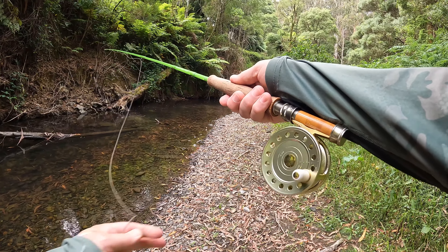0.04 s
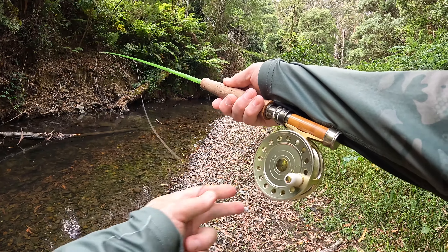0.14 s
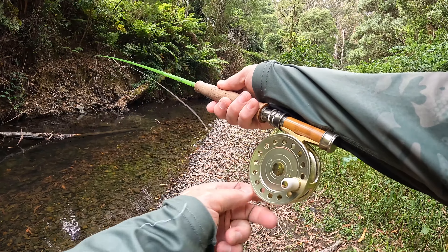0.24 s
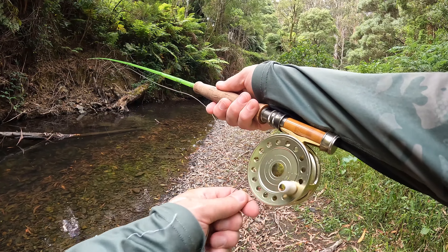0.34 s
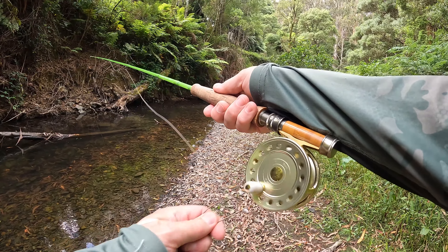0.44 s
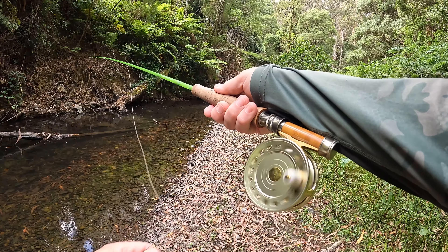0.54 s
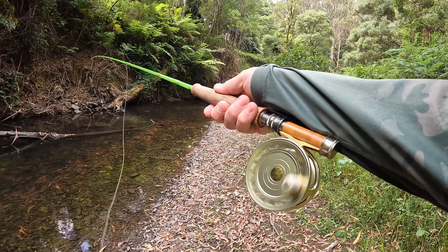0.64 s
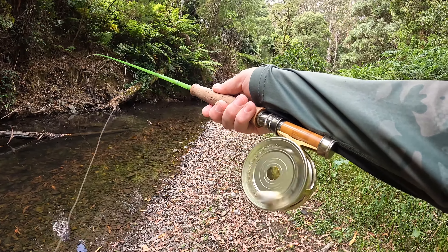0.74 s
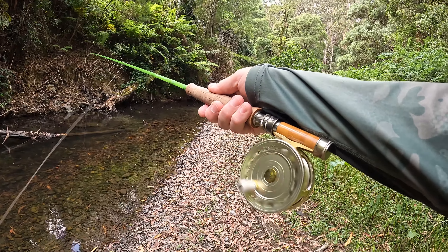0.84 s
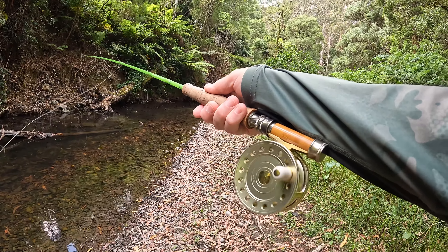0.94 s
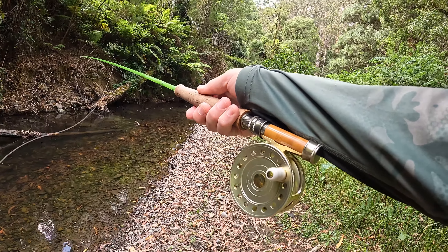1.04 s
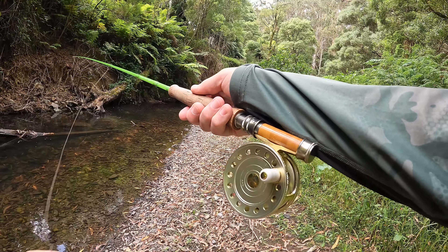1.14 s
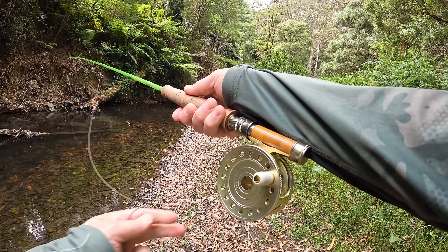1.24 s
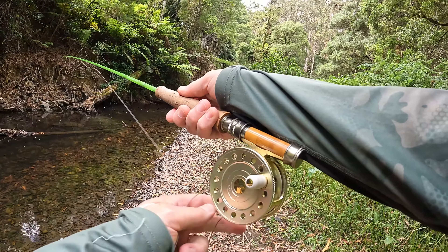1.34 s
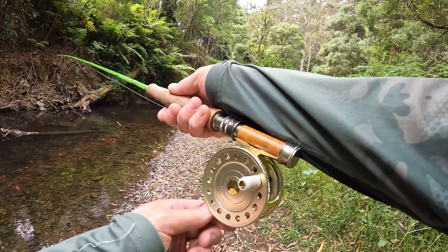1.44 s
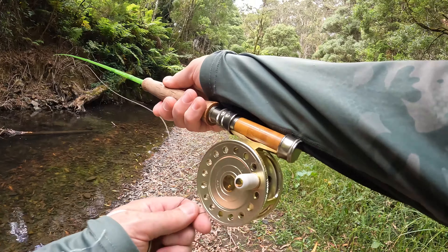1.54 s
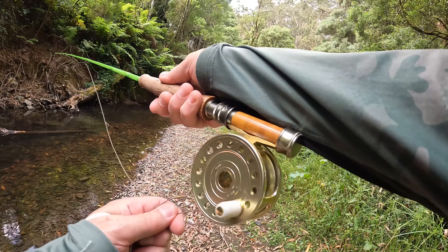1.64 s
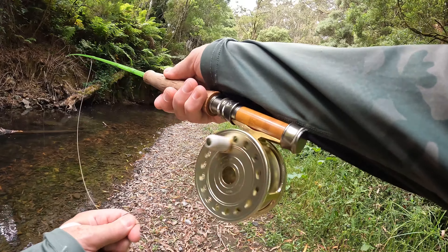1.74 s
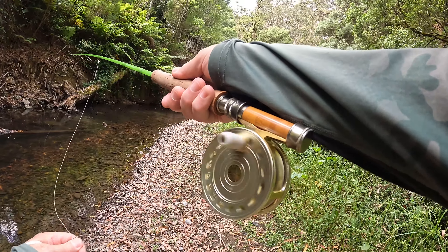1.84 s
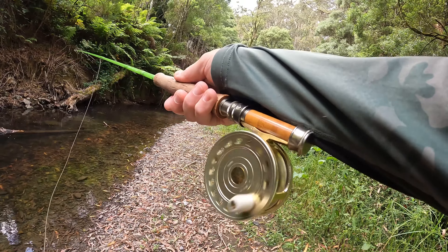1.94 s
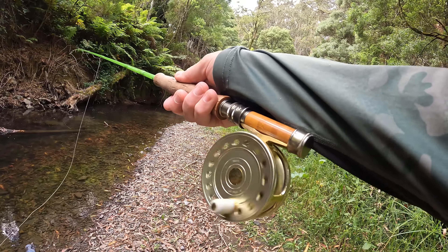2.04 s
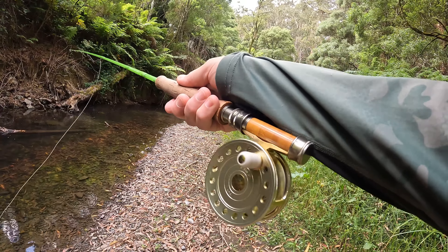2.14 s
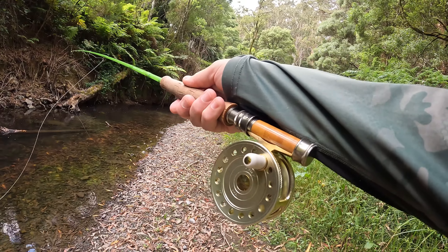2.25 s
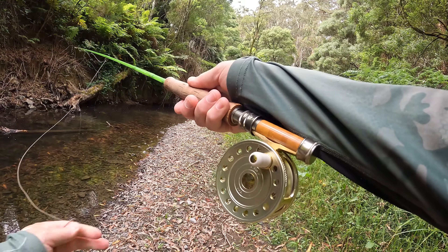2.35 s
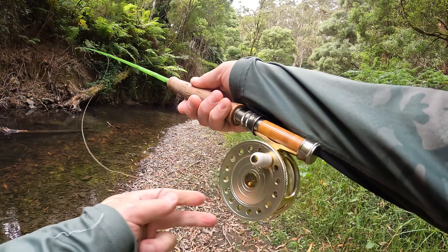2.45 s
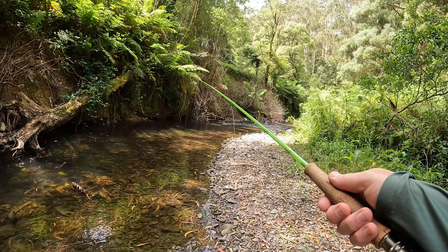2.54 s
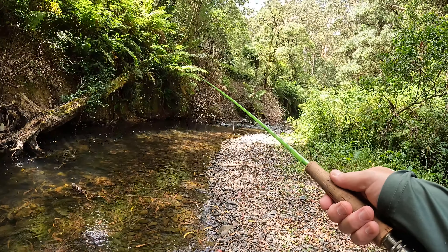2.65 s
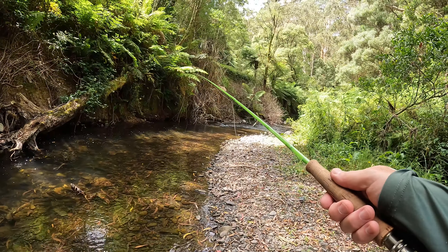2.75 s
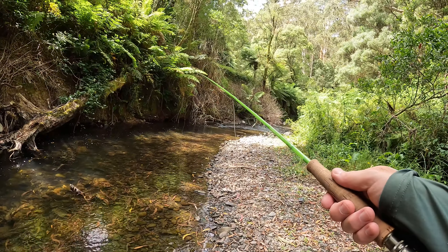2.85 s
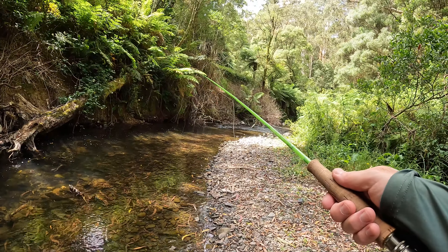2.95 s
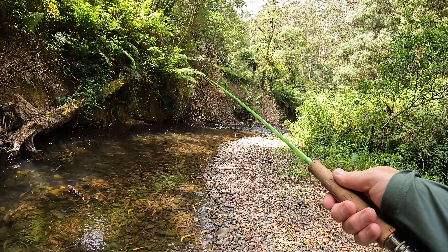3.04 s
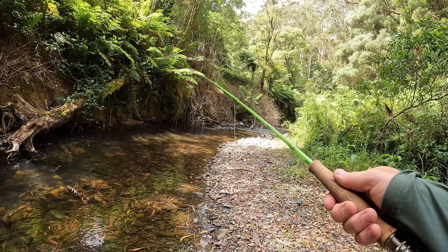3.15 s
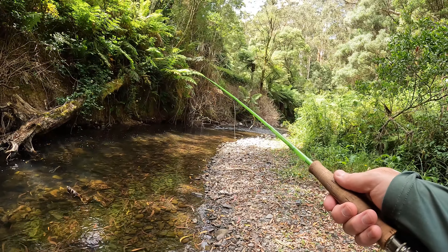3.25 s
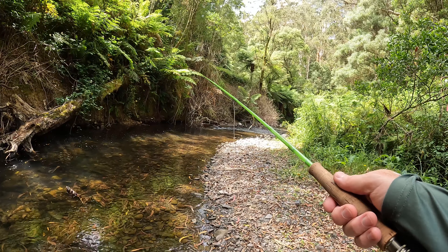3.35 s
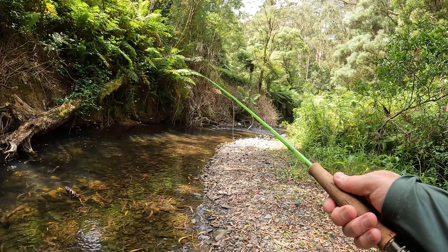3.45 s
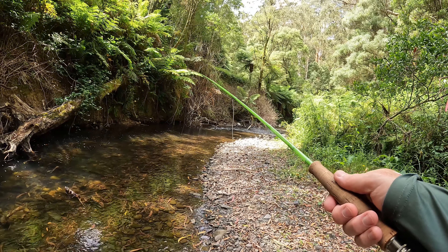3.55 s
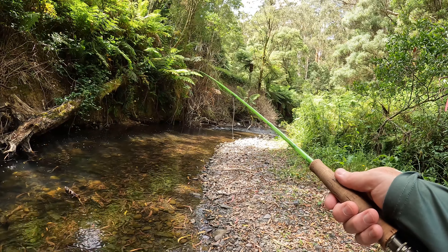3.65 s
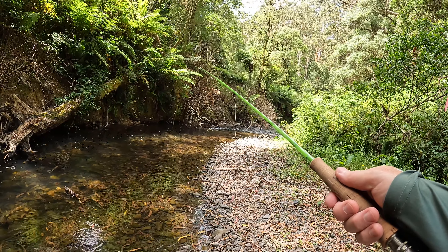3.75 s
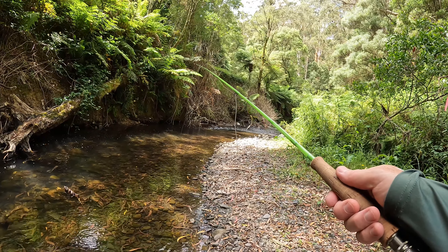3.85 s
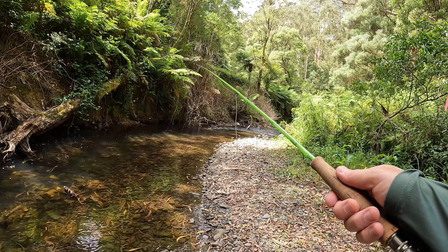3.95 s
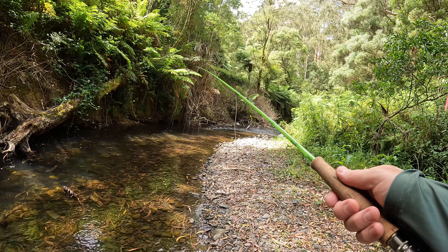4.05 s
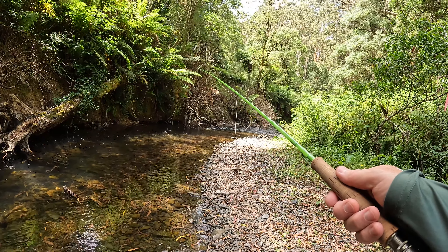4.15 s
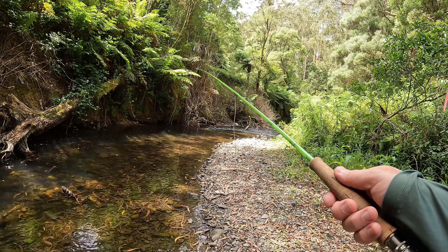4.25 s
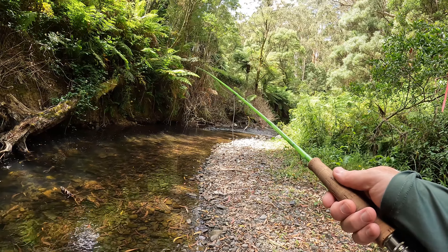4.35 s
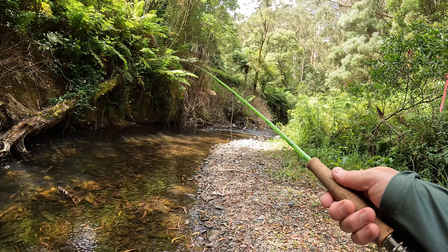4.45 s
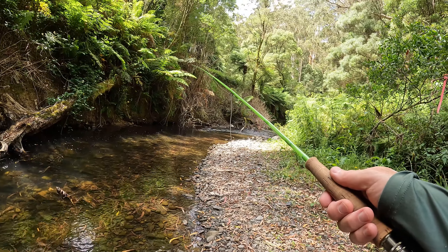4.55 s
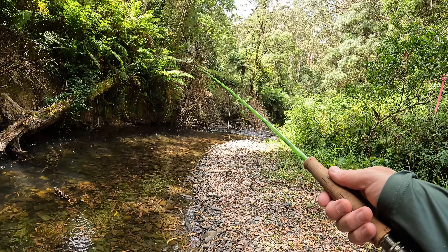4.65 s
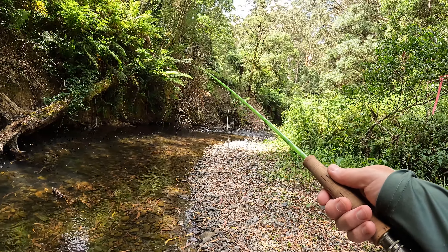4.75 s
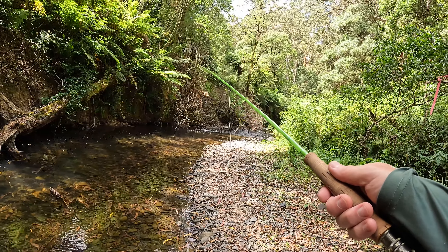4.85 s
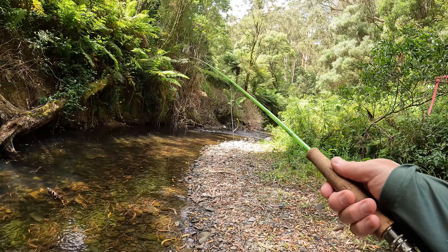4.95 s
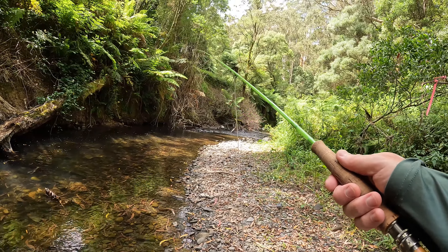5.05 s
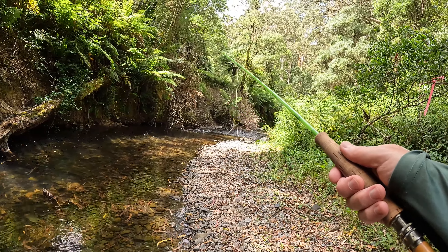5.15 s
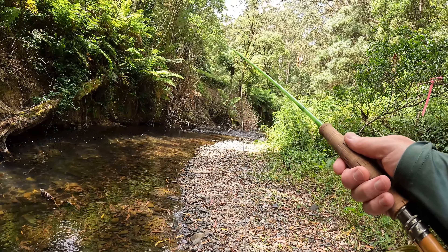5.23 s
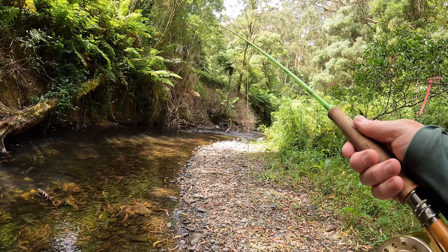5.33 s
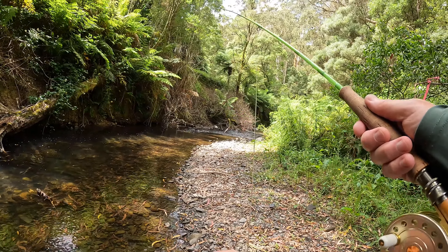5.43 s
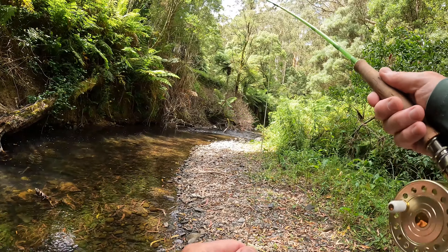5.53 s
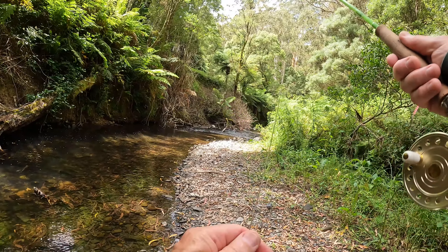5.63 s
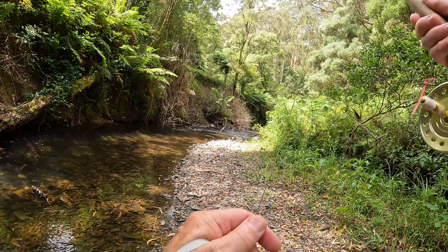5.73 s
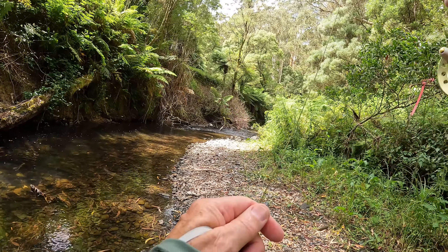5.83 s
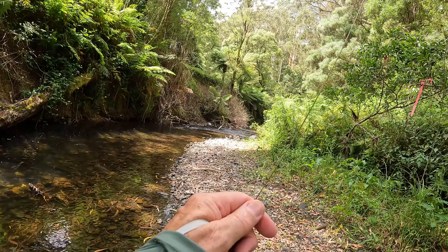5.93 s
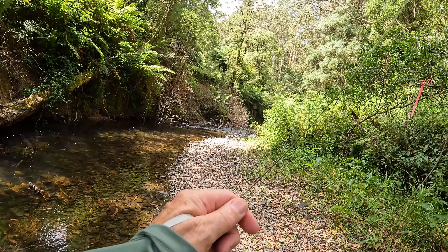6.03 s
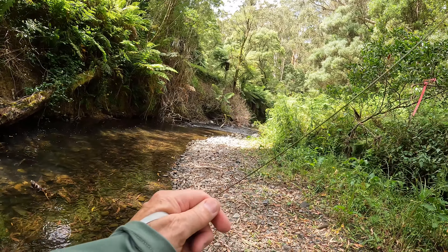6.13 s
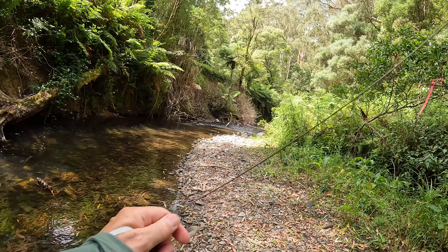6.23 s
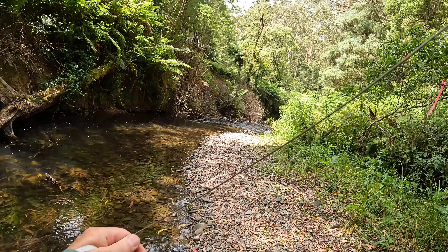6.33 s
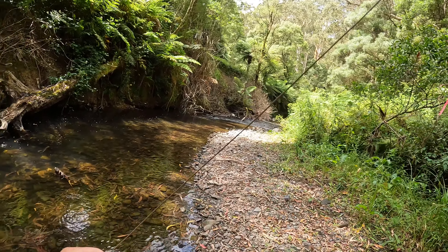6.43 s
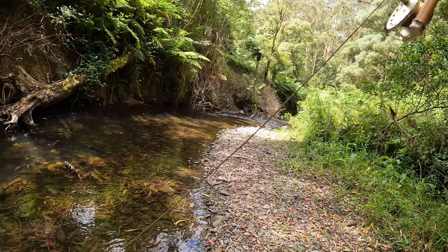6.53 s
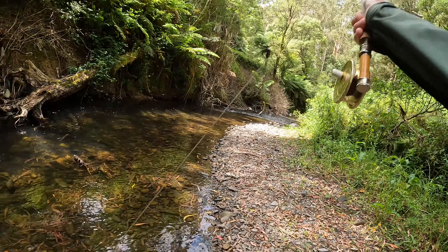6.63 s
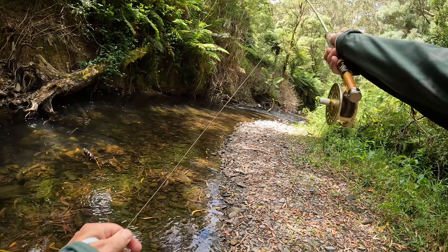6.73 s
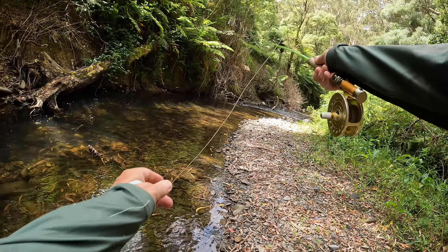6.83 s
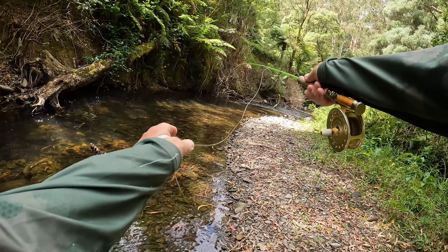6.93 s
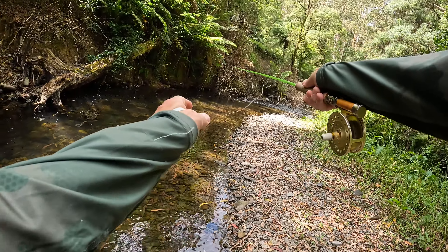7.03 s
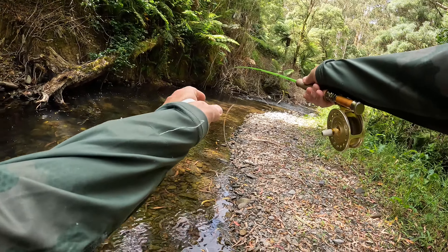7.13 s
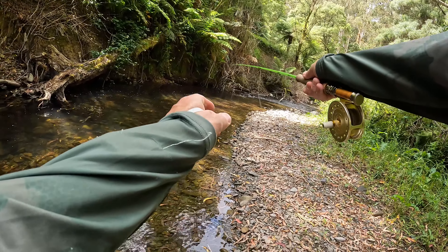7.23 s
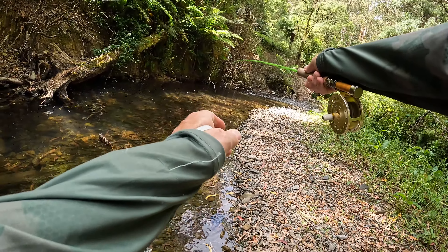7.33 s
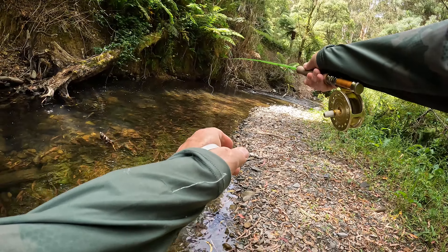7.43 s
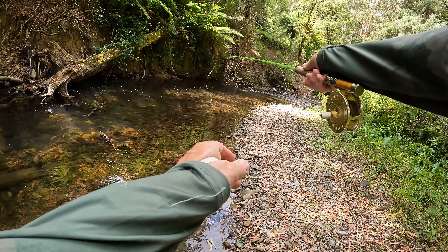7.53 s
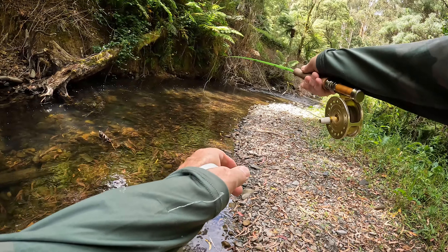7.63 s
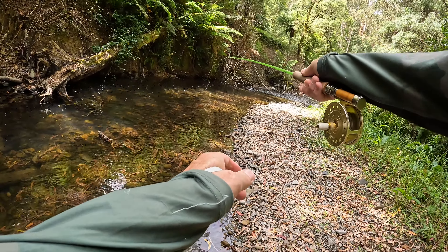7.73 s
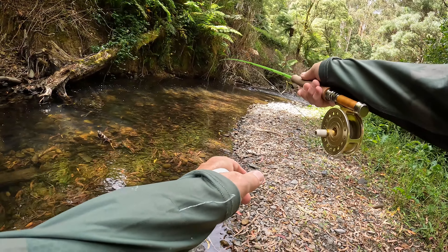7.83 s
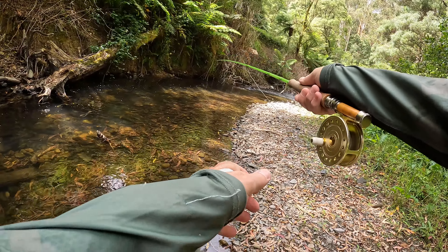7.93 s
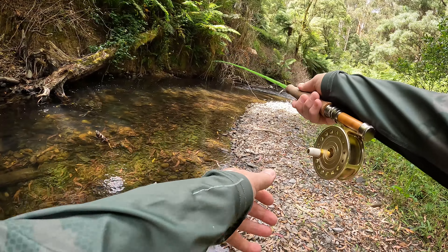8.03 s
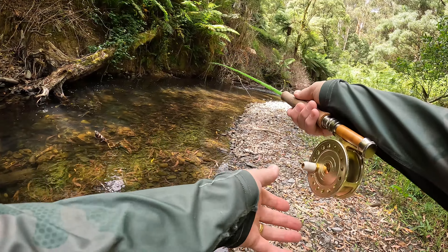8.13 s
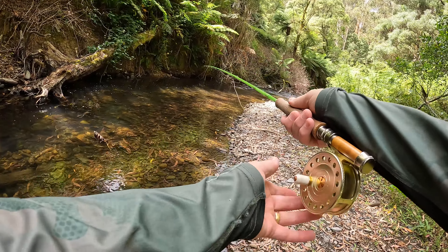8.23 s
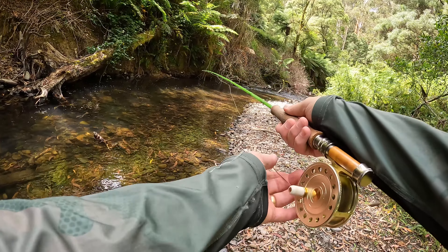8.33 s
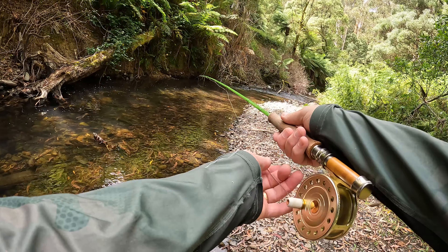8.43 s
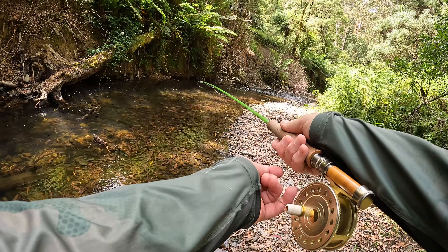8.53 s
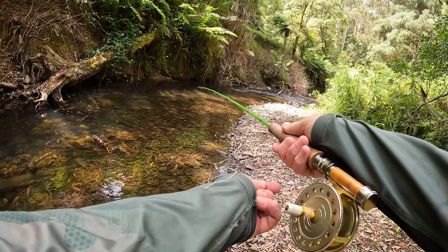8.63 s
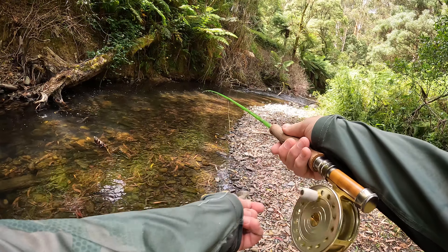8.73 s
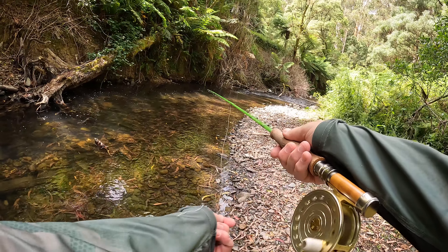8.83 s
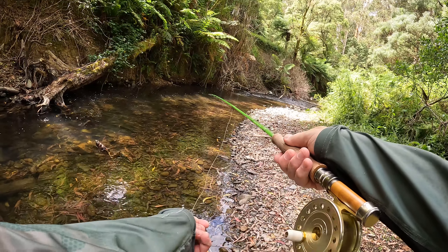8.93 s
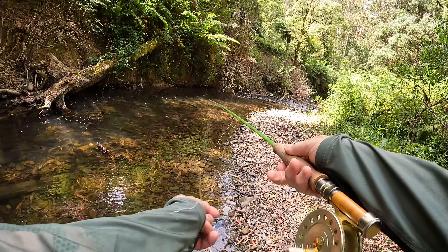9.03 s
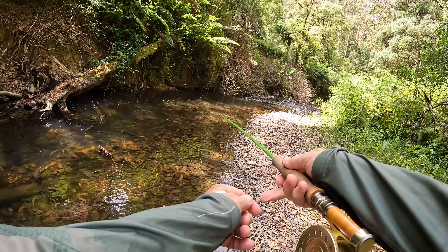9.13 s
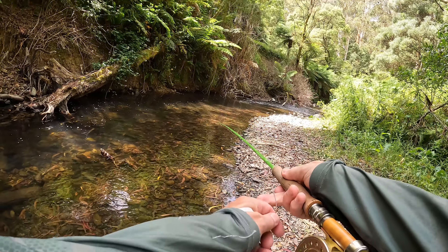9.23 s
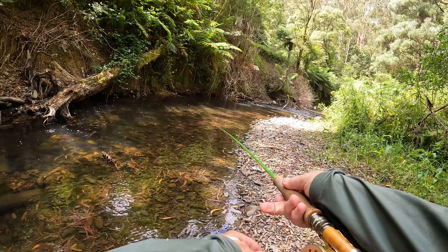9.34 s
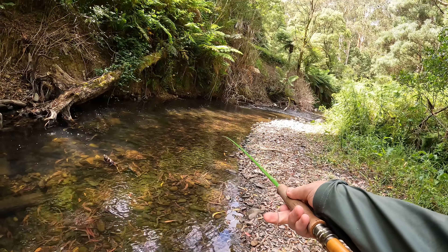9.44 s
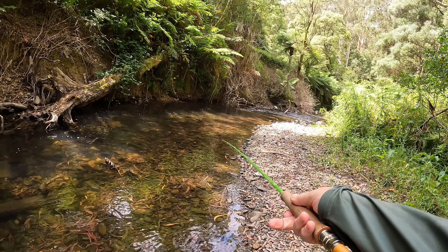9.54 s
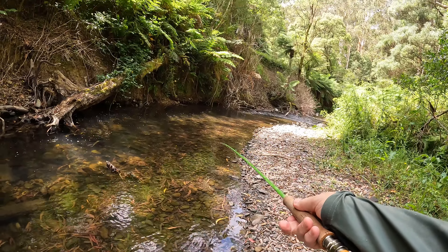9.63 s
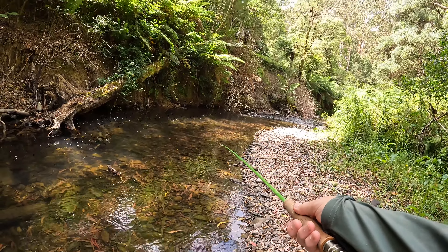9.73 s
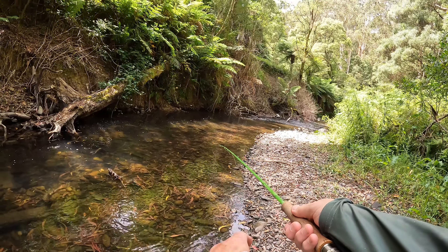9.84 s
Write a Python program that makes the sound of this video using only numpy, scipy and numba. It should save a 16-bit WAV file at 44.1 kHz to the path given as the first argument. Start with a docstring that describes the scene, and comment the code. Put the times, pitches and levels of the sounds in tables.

```python
"""Two long pulls of line off a fine click-and-pawl fly reel by a forest creek pool, each tooth snapping the pawl
and ringing spool and frame. At 2.55 s a second spot begins, beside a riffle: bubbles babble, birds whistle,
line scrapes and ticks through the rod rings, then one short pull rings a coarser reel.
Cloth brushes, knocks and low bumps come in between; gain control turns loud sounds down and creeps back."""
import sys
import numpy as np
from scipy import signal
from scipy.fft import rfft, irfft, next_fast_len
from scipy.io import wavfile
from scipy.ndimage import uniform_filter1d
from numba import njit

SR = 44100
rng = np.random.default_rng(int(sys.argv[2]) if len(sys.argv) > 2 else 0)


def write(x):
    x = np.atleast_2d(x).T
    wavfile.write(sys.argv[1], SR, np.round(np.clip(x, -1, 1) * 32767).astype(np.int16))


N = 435708
T = np.arange(N) / SR
SECOND_SPOT_S = 2.548
FINE_LOBE_TEETH, COARSE_LOBE_TEETH = 30, 38  # teeth between two swells of a ring

# Ring modes of each reel: (frequency [Hz], width [Hz], relative level [dB], swell phase [tooth], swell [dB])
FINE_MODES = [(781, 71, -13, 21.9, 4.5), (1130, 140, -26.5, 0.5, 6), (1449, 45, -9.5, 6.9, 7),
              (1820, 600, -28, 18, 5), (2237, 79, -10.5, 0.87, 2), (2630, 150, -8, 15, 3.5),
              (2974, 60, 4, 22.8, 1.5), (3224, 117, 3, 21.7, 3), (3316, 105, 1.5, 33, 2),
              (3660, 410, -11.5, 5.1, -2), (4260, 34, 0, 35, 0.5), (4490, 21, -13, 28, -6.5),
              (4730, 160, -7, 0.93, 4), (4960, 170, -9.5, 18.4, 9), (5200, 900, -19.5, 4, -3),
              (5630, 110, -11, 19, 0.5), (5950, 460, -23, 20, -2), (6440, 300, -15.5, 8.3, 1.5),
              (6970, 180, -11.5, 6.9, 3.5), (7780, 760, -24.5, 7.4, -2.5), (9640, 300, -24.5, 4.5, 1),
              (10760, 205, -13, 2.4, 3), (12800, 1300, -31, 8, 1.5)]
COARSE_MODES = [(1402, 62, -5.5, 22, 9.2), (1600, 280, -18.5, 10, 2.5), (1270, 105, -17.5, 16, 3.4),
                (2500, 860, -14.5, 1, 4), (2080, 81, -12, -2, 3.4), (2770, 130, -8.5, -1, 6.4),
                (2907, 65, -5.5, 25.5, 3), (3300, 145, 3.5, 15, 3.45), (3387, 48, 1.5, 12, 1.7),
                (3710, 380, -6, 1, 3.4), (4250, 44, -6, 17, 3.4), (4620, 140, -12.5, 22, 3),
                (5000, 180, -8.5, 14.5, 3.95), (5230, 240, -12, 6, 4), (5630, 700, -20, 6, 3),
                (7000, 15, -10, 30.5, 1.6), (7030, 580, -14, -3.5, 3.5), (8170, 450, -20.5, 5, 1),
                (10870, 370, -8.5, 15, 0.91), (11260, 400, -9.5, 13, 1), (12940, 260, -22.5, 4, 0.81)]


def undb(db):
    """Decibels to gain."""
    return 10 ** (np.asarray(db) / 20)


def unit(x):
    """Scale to standard deviation 1."""
    return x / np.std(x)


def band(x, hz, width_hz):
    """Fixed resonance with gain 1 at its centre."""
    hz = min(hz, .45 * SR)
    b, a = signal.iirpeak(hz, hz / min(width_hz, SR / 4), fs=SR)
    return signal.lfilter(b, a, x + 1e-18)


@njit
def moving_band(x, hz, width_hz):
    """State-variable resonance whose centre moves, with gain 1 there."""
    y, b, low = np.empty(len(x)), 0., 0.
    for i in range(len(x)):
        g, k = np.tan(np.pi * min(hz[i] / SR, .45)), width_hz / hz[i]
        k *= (np.pi * hz[i] / SR) * (1 + g * g) / g
        v = (b + g * (x[i] + 1e-18 - low)) / (1 + g * (g + k))
        b, low, y[i] = 2 * v - b, low + 2 * g * v, k * v
    return y


def colour(x, points):
    """Filter by (frequency [Hz], gain [dB]) points, joined on a log frequency axis."""
    hz, db = np.transpose(points)
    size = next_fast_len(N)
    f = np.maximum(np.arange(size // 2 + 1) * SR / size, 1)
    gain = undb(np.interp(np.log(f), np.log(hz), db))
    return irfft(rfft(x, size) * gain, size)[:N]


def walk(knots_per_s):
    """Random wandering, linear between knots, with standard deviation 1."""
    knots = rng.standard_normal(2048)
    return unit(np.interp(T * knots_per_s, np.arange(len(knots)), knots))


def impulses(times_s, sizes):
    """Impulses, each shared between two neighbouring samples."""
    out, at = np.zeros(N), np.asarray(times_s) * SR
    np.add.at(out, at.astype(int), sizes * (1 - at % 1))
    np.add.at(out, at.astype(int) + 1, sizes * (at % 1))
    return out


def add(out, start_s, sound):
    """Mix a short sound in."""
    part = out[int(start_s * SR):][:len(sound)]
    part += sound[:len(part)]


def pawl(times_s, sizes, chatter_s, tail_db=-22, tail_s=0.023):
    """The tip lands off a tooth with a clean snap and chatters briefly; the chatter dies away in the frame."""
    t = np.arange(SR // 12) / SR
    gate = np.exp(-(t / chatter_s) ** 4) + undb(tail_db) * np.exp(-t / tail_s)
    power = signal.oaconvolve(impulses(times_s, sizes ** 2), gate ** 2 / np.sum(gate ** 2))[:N]
    chatter = np.sqrt(np.abs(power)) * rng.standard_normal(N)
    snaps = np.roll(impulses(times_s, sizes), SR // 1500)  # lands after the chatter starts
    return snaps, chatter


def ring(snaps, chatter, modes, chatter_hz, passed, colour_db, lobe_teeth, skirt=0.34, bend=0.54):
    """Low modes feel the snap, high ones the chatter; each swells as its lobes turn past the microphone."""
    out = 0
    for k, (hz, width_hz, db, phase_tooth, swell_db) in enumerate(modes):
        rough = (hz / chatter_hz) ** 2
        # strike strength varies per tooth; pitch bends by a share of the width as the contact moves on
        luck = np.interp(passed, np.arange(256), rng.standard_normal(256))
        drift = np.interp(passed / 4, np.arange(256), rng.standard_normal(256))
        drive = undb(colour_db * luck) * (snaps + rough * chatter) / np.hypot(1, rough)
        facing = np.cos(2 * np.pi * (passed - phase_tooth) / lobe_teeth)
        mode = moving_band(drive, hz + bend * width_hz * drift, float(width_hz))
        out = out + (-1) ** k * undb(db + swell_db * facing) * band(mode, hz, skirt * hz)
    return out


def glide(drive, passed, from_hz=2380, to_hz=2950, width_hz=170, first_tooth=11, teeth=12, glide_db=-8):
    """Every 30 teeth one ring of the fine reel fades in, slides upwards and fades out."""
    along = np.minimum((passed - first_tooth) % 30 / teeth, 1)
    centre_hz = from_hz + (to_hz - from_hz) * along
    sliding_ring = moving_band(drive * np.sin(np.pi * along), centre_hz, float(width_hz))
    return undb(glide_db) * band(sliding_ring, (from_hz + to_hz) / 2, 1500)


def pull(row, modes, chatter_s, chatter_hz, jitter_s, scatter_db, limp_db, rod_db, colour_db, lobe_teeth,
         glides, rod_hz=150, rod_chatter=0.42, waver=0.01223, waver_knots_per_s=70.62, snap_db_per_octave=0.02):
    """The spool follows the uneven hand; the pawl snaps once a tooth, alternately harder and softer."""
    speed, start_db, stop_db, start_tooth = row
    tooth_hz = np.interp(T, *np.transpose(speed), left=0, right=0) * (1 + waver * walk(waver_knots_per_s))
    passed, turning = np.cumsum(tooth_hz) / SR, tooth_hz > 0
    start_s, stop_s = T[turning][[0, -1]]

    tooth = np.arange(round(passed[-1]) + 1)
    late, hard = rng.standard_normal((512, 2))[:len(tooth)].T
    even_teeth = tooth * passed[-1] / tooth[-1]
    times_s = np.interp(even_teeth, passed[turning], T[turning]) + jitter_s * late
    octaves = np.log2(np.interp(times_s, T[turning], tooth_hz[turning]) / 100)
    force_db = np.interp(times_s, [start_s, stop_s], [start_db, stop_db]) + snap_db_per_octave * octaves
    sizes = undb(force_db + scatter_db * hard + limp_db * (-1) ** tooth)
    snaps, chatter = pawl(times_s, sizes, chatter_s)

    # dull purr through rod and arm
    purr = band(band(snaps + rod_chatter * chatter, rod_hz, 200), rod_hz, 200)
    out = undb(rod_db) * purr
    heard = (T > start_s - .01) & (T < stop_s + .3)
    angle = start_tooth + passed[heard]
    out[heard] += ring(snaps[heard], chatter[heard], modes, chatter_hz, angle, colour_db, lobe_teeth)
    if glides:
        out[heard] += glide(snaps[heard], angle)
    return out


def reel_pulls(fine_db=32.5, coarse_db=33.0):
    """Two pulls turn the fine reel and one the coarse reel, each with its own ring modes and pawl."""
    # Spool speed as the hand draws line, with small hesitations: (time [s], teeth passing the pawl [Hz])
    FIRST_SPEED = [(.4772, 83), (.508, 88), (.535, 105), (.585, 185), (.625, 212), (.705, 328), (.735, 340),
                   (.77, 324), (.805, 336), (.83, 386), (.86, 377), (.885, 380), (.91, 352), (.955, 288),
                   (.985, 205), (1.003, 150), (1.03, 97), (1.0636, 48)]
    SECOND_SPEED = [(1.7025, 48), (1.72, 66), (1.76, 125), (1.79, 142), (1.84, 240), (1.865, 258),
                    (1.96, 420), (2, 405), (2.07, 390), (2.11, 305), (2.165, 275), (2.2, 195), (2.24, 97),
                    (2.2656, 50)]
    SHORT_SPEED = [(8.7973, 60), (8.815, 99), (8.845, 116), (8.87, 116), (8.9, 139), (8.945, 139),
                   (8.975, 113), (9.01, 69), (9.0369, 38)]
    # Pulls: (reel, spool speed, force at start [dB], force at stop [dB], first tooth)
    pulls = [("fine", FIRST_SPEED, 0, -0.88, 0), ("fine", SECOND_SPEED, -0.18, .7, -4.5),
             ("coarse", SHORT_SPEED, -0.3, 0.64, 0)]
    fine_reel = dict(
        modes=FINE_MODES, chatter_s=0.0023, chatter_hz=5000, jitter_s=.00005, scatter_db=1.0, limp_db=1.0,
        rod_db=-32.5, colour_db=2, lobe_teeth=FINE_LOBE_TEETH, glides=True)
    coarse_reel = dict(
        modes=COARSE_MODES, chatter_s=0.0024, chatter_hz=5200, jitter_s=.00006, scatter_db=-0.26, limp_db=0.8,
        rod_db=-26.5, colour_db=2.5, lobe_teeth=COARSE_LOBE_TEETH, glides=False)
    fine = sum(pull(row, **fine_reel) for reel, *row in pulls if reel == "fine")
    coarse = sum(pull(row, **coarse_reel) for reel, *row in pulls if reel == "coarse")
    return undb(fine_db) * fine + undb(coarse_db) * coarse


def settling(settle_db=35.5, dull_width_hz=1700, clack_db=-3, clack_width_hz=1700, creep_db=-19,
             creep_s=0.0073, tip_db=-27, tip_hz=6700, tip_width_hz=900):
    """The spool rocks back, the pawl creeps and drops into a tooth: a dull ring and a faint tick of the tip."""
    # Drops: (time [s], relative level [dB], brightest frequency [Hz], resting spool position [tooth])
    settles = [(0.045, -30, 2500, 4), (0.0543, -14.5, 2700, 2.5), (1.1366, -16, 2970, 2.5),
               (2.3494, -16, 3230, 18.5), (9.1379, -15.5, 3050, 18)]
    out = np.zeros(N)
    for s, db, hz, tooth in settles:
        heard = (T > s - .03) & (T < s + .3)
        snaps, chatter = (part[heard] for part in pawl([s], undb([db]), chatter_s=0.0012))
        creep = rng.standard_normal(len(snaps)) * np.exp(-np.abs(T[heard] - s) / creep_s) * (T[heard] < s)
        drive = snaps + undb(db + creep_db) * creep / np.linalg.norm(creep)
        if s < SECOND_SPOT_S:
            modes, lobe_teeth = FINE_MODES, FINE_LOBE_TEETH
        else:
            modes, lobe_teeth = COARSE_MODES, COARSE_LOBE_TEETH
        body = ring(drive, chatter, modes, chatter_hz=8000, passed=np.full(len(snaps), tooth),
                    colour_db=4, lobe_teeth=lobe_teeth, bend=0)
        clack = band(np.roll(drive, SR // 2000), hz, clack_width_hz)  # the pawl's own
        body = body + undb(clack_db) * clack
        tip = band(band(snaps, tip_hz, tip_width_hz), tip_hz, tip_width_hz)
        out[heard] += band(band(body, hz, dull_width_hz), hz, dull_width_hz) + undb(tip_db) * tip
    return undb(settle_db) * out


def sliding(rows, attack_s=0.084, release_s=0.017):
    """Strength of a rubbing contact: each stroke swells, holds and dies away."""
    return sum(undb(db) * np.exp(np.minimum(T - s, 0) / attack_s - np.maximum(T - s - length_s, 0) / release_s)
               for s, length_s, db in rows)


def line(grain_db=2, clump_db=1.6, crackle_db=-3, rasp_db=4, rasp_hz=4700, tick_db=2, tick_s=0.0031,
         tick_width_hz=3800):
    """Line scrapes and crackles through rod rings and fingers, and ticks against the rod."""
    # Strokes: (start [s], length [s], level [dB])
    strokes = [(5.62, 0.5, -49), (6.85, 0.3, -42), (7.23, 0.2, -43.5), (9.52, 0.13, -47.5)]
    # Spectrum of the scrape: (frequency [Hz], density [dB per Hz])
    slide_colour = [(1000, -24.5), (2200, -8.5), (3400, -1.5), (4600, -4), (7000, -10), (8500, -25),
                    (11000, -20.5), (13000, -33), (16000, -52)]
    # Ticks: (time [s], peak level before tick_db [dB], ring frequency [Hz])
    ticks = [(1.3994, -31, 5000), (1.414, -33, 5200), (1.527, -30, 2260), (1.6254, -29, 3020),
             (1.6525, -56.5, 2960), (4.703, -34.5, 2120), (6.68, -78, 2550), (6.697, -29, 2800),
             (6.705, -39, 2200), (6.8323, -34, 4010), (6.8596, -34, 4160), (6.919, -32, 3180),
             (6.9674, -19.5, 3470), (7.005, -24, 3660), (7.0165, -30, 4580), (7.114, -30, 3620),
             (7.126, -29, 4500), (7.2575, -35, 4490), (7.3753, -24.5, 4500), (7.388, -28, 4600),
             (7.409, -27, 4200), (7.4682, -33, 4620), (7.57, -34, 2670)]
    catches = unit(impulses(rng.random(3000) * T[-2], rng.standard_normal(3000)))
    scrape = rng.standard_normal(N) * undb(grain_db * walk(130) + clump_db * walk(25))
    scrape = scrape + undb(crackle_db) * catches
    tension_hz = rasp_hz * (1 + 0.21 * walk(70))  # pitch shifts with the tension
    scrape = scrape + undb(rasp_db) * moving_band(scrape, tension_hz, 450.)
    out = unit(colour(scrape, slide_colour)) * sliding(strokes)
    t = T[:SR // 40]
    for s, db, hz in ticks:
        burst = rng.standard_normal(len(t)) * np.exp(-t / tick_s)
        tick = band(band(burst, hz, tick_width_hz), hz, tick_width_hz)
        tick = uniform_filter1d(tick, size=3)  # the coating softens the contact
        add(out, s, undb(db + tick_db) * tick / np.abs(tick).max())
    return out


def singing(hz=3000, width_hz=200):
    """Line rubbing on the resting reel keeps one mode ringing faintly."""
    # Rubs: (start [s], length [s], level [dB])
    rubs = [(.08, 0.15, -49), (.39, 0.091, -43), (1.62, 0.065, -54)]
    return unit(band(band(rng.standard_normal(N), hz, width_hz), hz, 2 * width_hz)) * sliding(rubs)


def sleeve(crumple_db=3):
    """The sleeve brushes past as the hand reaches for line: noise in small crumples."""
    # Brushes: (start [s], length [s], level [dB])
    brushes = [(1.49, 0.17, -41.5), (5.1, 0.17, -43.5), (8.3, 0.079, -46)]
    # Spectrum of the cloth: (frequency [Hz], density [dB per Hz])
    sleeve_colour = [(40, -30), (120, -13), (270, 1), (600, -2.5), (1500, -8), (2800, -5.5), (5000, -25.5),
                     (8000, -38.5), (12000, -46)]
    cloth = rng.standard_normal(N) * undb(crumple_db * walk(70))
    return unit(colour(cloth, sleeve_colour)) * sliding(brushes)


def thuds(rows, modes, contact_s):
    """Padded blows: decaying noise excites a few short, hollow modes."""
    out, t = np.zeros(N), T[:SR // 5]
    for s, db in rows:
        push = rng.standard_normal(len(t)) * np.exp(-t / contact_s)
        thud = sum(undb(mode_db) * band(band(push, hz, width_hz), hz, 2 * hz) for hz, width_hz, mode_db in modes)
        add(out, s, undb(db) * thud / np.abs(thud).max())
    return out


def hand_knocks():
    """Soft knocks of the hand ring the tackle."""
    # Knocks: (time [s], peak level [dB])
    knocks = [(4.82, -31), (6.706, -17), (6.713, -24)]
    # Modes of the tackle: (frequency [Hz], width [Hz], relative level [dB])
    knock_modes = [(90, 33, -18), (378, 53, 11), (483, 66, 9), (980, 140, -6.5), (2270, 330, -7.5)]
    return thuds(knocks, knock_modes, contact_s=0.0039)


def bumps(pulse_from_s=2.81, pulse_every_s=1.022, pulse_db=-57, count=4):
    """Dull, low thumps: the microphone on its strap, and a faint pulse recurring about once a second."""
    # Further bumps, the strap's plus one late beat of the pulse at 7.94 s: (time [s], peak level [dB])
    further_bumps = [(1.66, -50), (6.74, -55), (7.94, -59), (9.42, -54)]
    pulses = [(pulse_from_s + k * pulse_every_s, pulse_db) for k in range(count)]
    return thuds(further_bumps + pulses, [(65.3, 35, 0)], contact_s=0.021)


def bubbles(count=3200, low_hz=220, high_hz=3000, cycles=9, rise=0.11, spread_db=2.5):
    """Small bubbles of all sizes, each a short ring that rises in pitch."""
    out = np.zeros(N)
    for when, size, luck in rng.random((count, 3)):
        hz = low_hz * (high_hz / low_hz) ** size
        age = np.arange(int(3 * cycles * SR / hz)) * hz / SR / cycles
        strength = undb(-spread_db * np.log(max(luck, .01))) * np.sqrt(hz)
        tone = np.sin(2 * np.pi * cycles * age * (1 + rise * age / 2))
        add(out, when * T[-1], strength * np.exp(-2 * age) * tone)
    return unit(out)


def creek(pool_db=-40.5, bubble_db=-15, surge_db=0.34, babble_db=2, babble_hz=380, splash_db=1.4,
          splash_hz=2000, side_db=-29):
    """Rushing water and bubbles; low babble gulps, splashing swells. Returns middle and side."""
    # Spectra at the two spots: (frequency [Hz], density [dB per Hz])
    pool_colour = [(18, -54), (30, -49), (274, -11.5), (311, -9.5), (766, -12.5), (1040, -20),
                   (1570, -15.5), (4750, -24), (5140, -28), (6150, -30.5), (6990, -29.5), (7750, -40),
                   (11500, -45), (14000, -62)]
    riffle_colour = [(30, -28), (90, -41), (125, -24), (165, -11), (260, -4.5), (450, -2), (580, -1.5),
                     (800, -9), (1300, -8.5), (2600, -8.5), (4600, -17.5), (7000, -25.5), (8200, -37),
                     (11100, -37.5), (14000, -58)]
    # Riffle: (time [s], level [dB])
    riffle_level = [(2.55, -41.5), (3.3, -39.5), (4.1, -40.5), (5.2, -41), (6.2, -39.5), (7.3, -40.5),
                    (7.9, -42.5), (8.4, -40), (9.8, -40)]
    water = (rng.standard_normal(N) + undb(bubble_db) * bubbles()) * undb(surge_db * walk(9))
    water = water + band(water, babble_hz, 300) * (undb(babble_db * walk(26)) - 1)
    water = water + band(water, splash_hz, 1200) * (undb(splash_db * walk(17)) - 1)
    pool = unit(colour(water, pool_colour)) * undb(pool_db)
    riffle = unit(colour(water, riffle_colour)) * undb(np.interp(T, *np.transpose(riffle_level)))
    banks = unit(colour(rng.standard_normal(N), riffle_colour)) * np.std(riffle) * undb(side_db)
    return np.where(T < SECOND_SPOT_S, pool, riffle), banks


def plops(plop_s=0.0095, rise=0.144):
    """Single larger bubbles burst above the rush, each a ring that rises in pitch."""
    # Plops: (time [s], starting frequency [Hz], envelope peak [dB])
    gurgles = [(3.11, 340, -36), (3.46, 320, -38), (3.955, 440, -40), (4.38, 370, -37), (5.245, 1400, -39),
               (5.262, 1550, -42), (5.71, 440, -39), (5.85, 530, -42), (7.76, 520, -39), (7.99, 440, -39),
               (8.24, 510, -40), (8.47, 532, -36.5), (8.655, 290, -39)]
    out, t = np.zeros(N), T[:SR // 10]
    envelope = t / plop_s * np.exp(1 - t / plop_s)
    for s, hz, db in gurgles:
        tone = np.sin(2 * np.pi * hz * t * (1 + rise * t / plop_s / 10))
        add(out, s, undb(db) * envelope * tone)
    return out


def birds(waver=0.02, forest_s=0.07, wet=0.7, distance_db=-2.5):
    """Small birds: thin wavering sine notes, blurred by echoes from the trees."""
    # Notes: (time [s], length [s], start [Hz], end [Hz], level before distance_db [dB])
    notes = [(1.257, .15, 6760, 7100, -45), (3.125, .033, 3560, 3400, -37), (3.215, .05, 2250, 2900, -39.5),
             (3.25, .045, 2900, 2300, -40.5), (3.29, .04, 2600, 2640, -43), (3.318, .03, 3650, 3300, -41),
             (3.405, .05, 2450, 2360, -40.5), (3.43, .045, 3450, 4000, -42), (3.525, .04, 1950, 2300, -39),
             (3.555, .04, 2720, 2760, -44), (3.59, .055, 2450, 1720, -38), (3.63, .03, 2550, 2780, -42.5),
             (3.635, .03, 3700, 3300, -41), (3.755, .03, 3950, 3360, -41.5), (3.86, .05, 3430, 3450, -39.5),
             (3.875, .03, 2500, 2800, -42), (3.905, .05, 3050, 2850, -43), (4.02, .045, 1950, 2250, -41),
             (4.055, .035, 2100, 1680, -39), (4.105, .045, 3250, 3350, -39.5), (4.21, .03, 3900, 3370, -43),
             (4.315, .04, 3130, 3120, -41.5), (3.78, .165, 8250, 8700, -62),
             (4.735, .046, 7400, 6400, -51.5), (5.46, .022, 7500, 7100, -54), (6.19, .16, 8240, 8500, -62)]
    out, wobble = np.zeros(N), 1 + waver * walk(100)
    for s, length_s, start_hz, end_hz, db in notes:
        n = int(length_s * SR)
        hz = np.linspace(start_hz, end_hz, n) * wobble[int(s * SR):][:n]
        add(out, s, undb(db) * np.sqrt(np.hanning(n)) * np.sin(2 * np.pi * np.cumsum(hz) / SR))
    echoes = rng.standard_normal(SR // 2) * np.exp(-T[:SR // 2] / forest_s)
    echoed = signal.oaconvolve(out, echoes / np.linalg.norm(echoes))[:N]
    return undb(distance_db) * (out + wet * echoed)


def scene():
    """Sources sit in the middle; the two microphone ports differ mostly in the top octave."""
    # Port difference: (frequency [Hz], side relative to middle [dB])
    ports = [(60, -18), (250, -41.5), (2500, -66.5), (4500, -37), (8000, -18.5), (11000, -15.5),
             (13000, -3.5)]
    reels = reel_pulls() + settling()
    handling = line() + sleeve() + singing() + hand_knocks() + bumps()
    water, banks = creek()
    mid = reels + handling + water + plops() + birds()
    scatter = rng.standard_normal(SR // 300)
    scattered = signal.oaconvolve(mid, scatter / np.linalg.norm(scatter))[:N]
    side = banks + colour(scattered, ports)
    return np.array([mid + side, mid - side])


def gain_control(x, held_db, top_db=-10.5, release_db_per_s=7.0):
    """Turns down within milliseconds when the sound passes the top level, and creeps back up."""
    power = uniform_filter1d(x.mean(axis=0) ** 2, SR // 200)
    over_db = np.maximum(10 * np.log10(np.abs(power) + 1e-12) - top_db, 0)
    over_db[0] = held_db  # cut at the first sample
    release_db = release_db_per_s * T[:len(power)]
    cut_db = np.maximum.accumulate(over_db + release_db) - release_db
    return x * undb(-uniform_filter1d(cut_db, SR // 500))


def record(dry, notch_hz=9000, notch_width_hz=800, ceiling=.85, top_hz=16000):
    """The cover notches the treble, gain control restarts at the second spot, peaks round, the top is cut."""
    x = dry - band(dry, notch_hz, notch_width_hz)
    split = int(SECOND_SPOT_S * SR)
    first = gain_control(x[:, :split], held_db=12.0)
    second = gain_control(x[:, split:], held_db=-15.0)
    x = np.hstack([first, second])
    x = x / (1 + (x / ceiling) ** 6) ** (1 / 6)
    return signal.sosfilt(signal.ellip(8, .2, 70, top_hz, fs=SR, output="sos"), x)


dry = scene()
out = record(dry)
write(out)
```